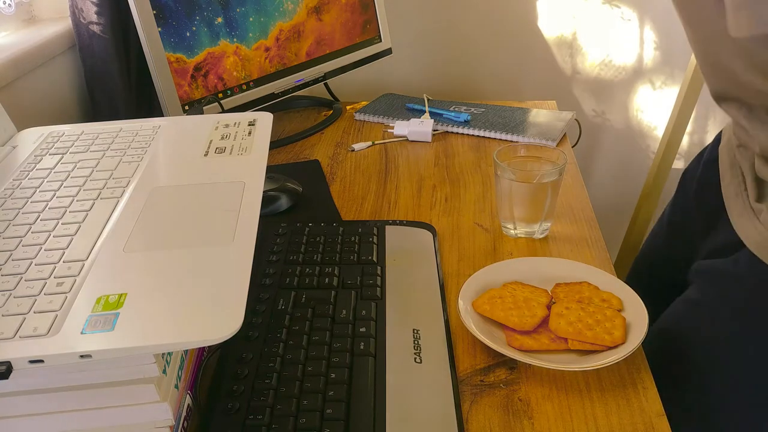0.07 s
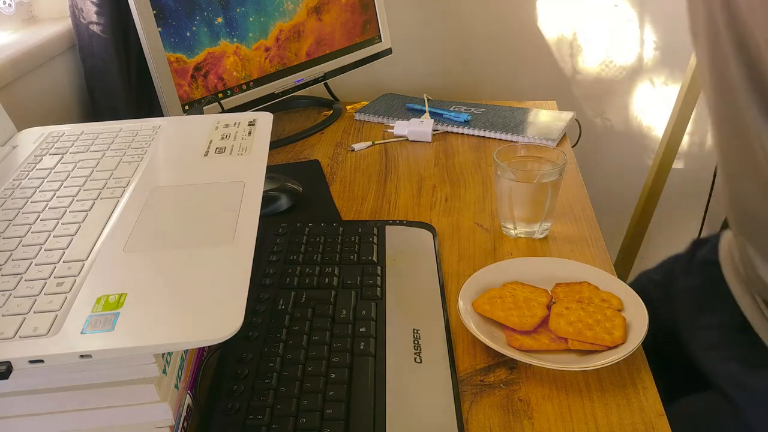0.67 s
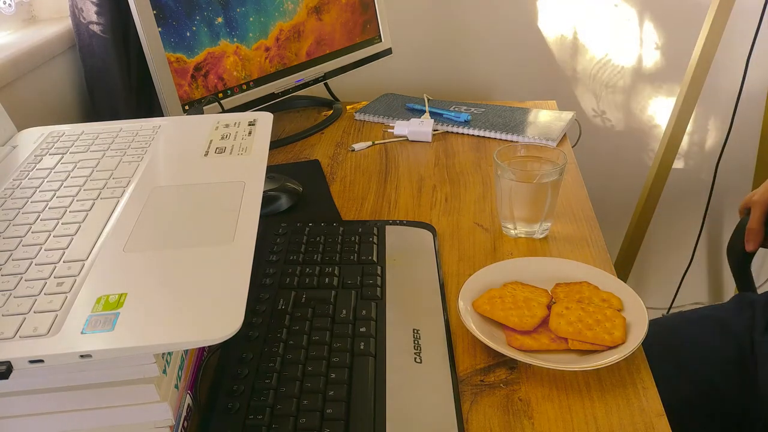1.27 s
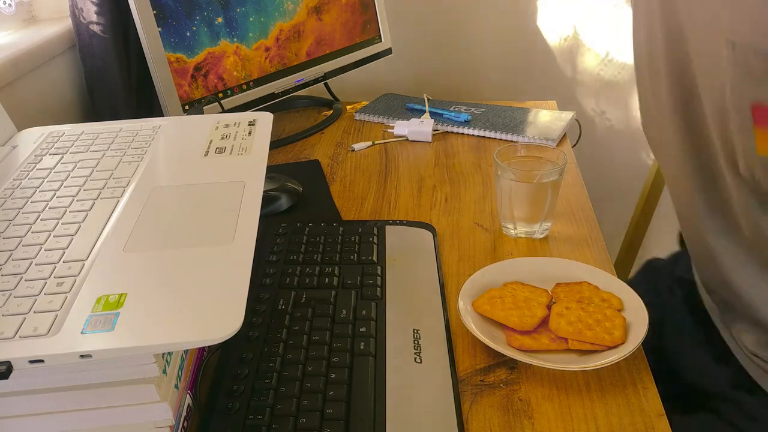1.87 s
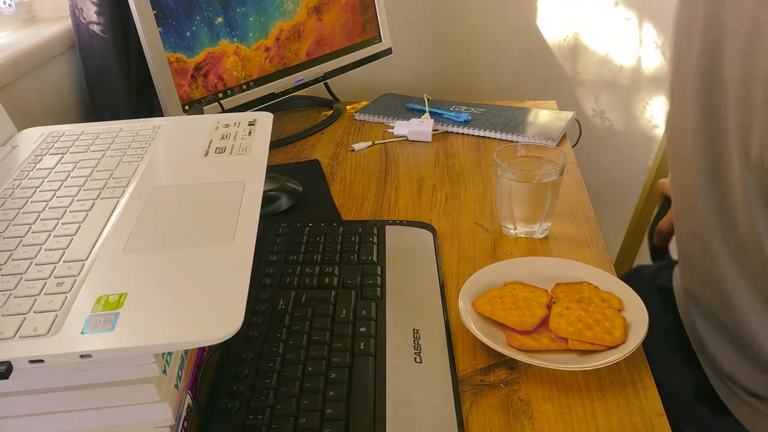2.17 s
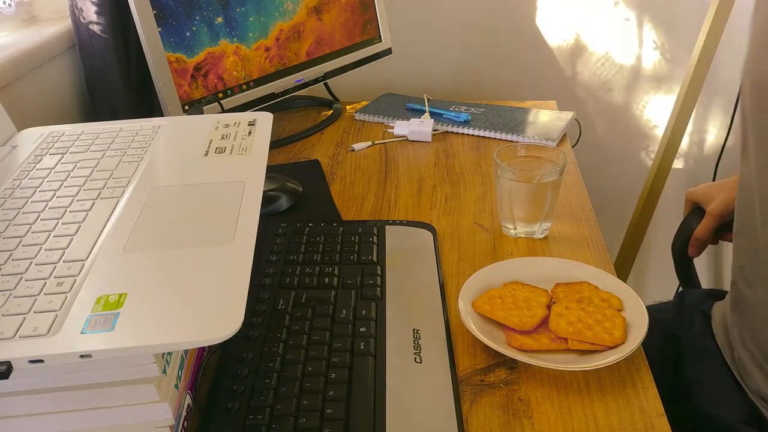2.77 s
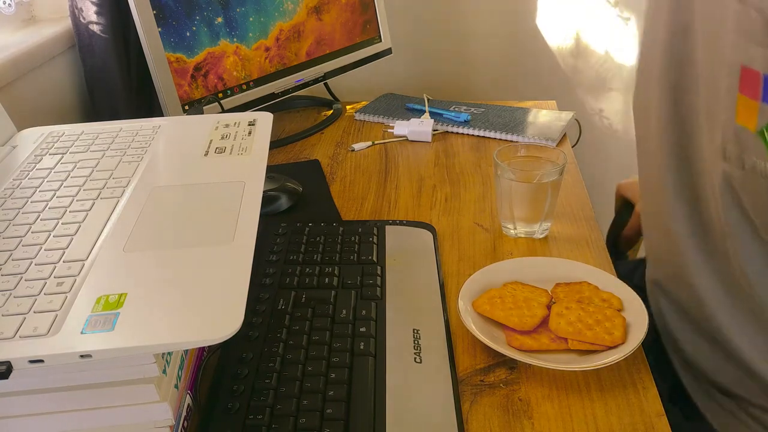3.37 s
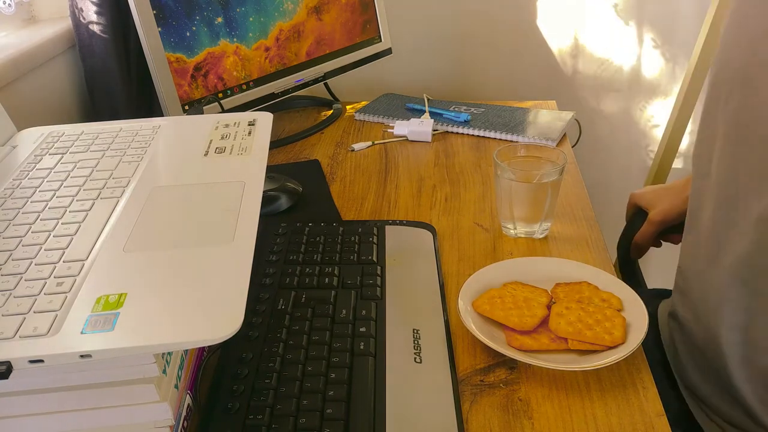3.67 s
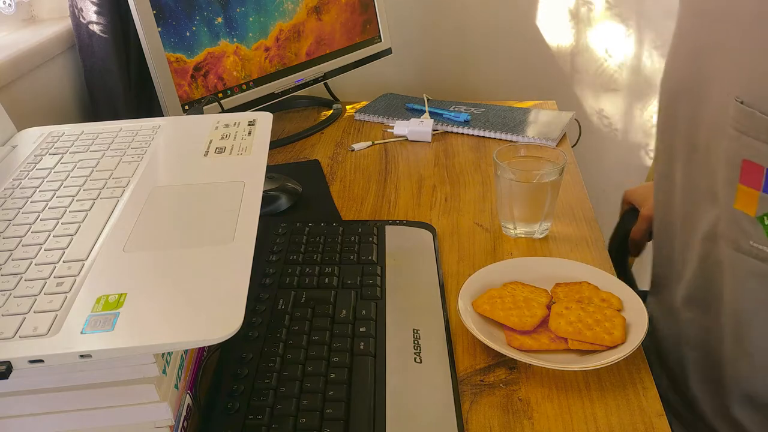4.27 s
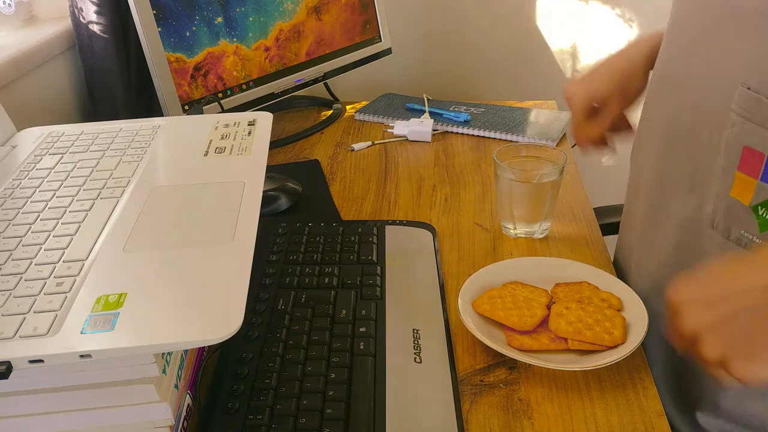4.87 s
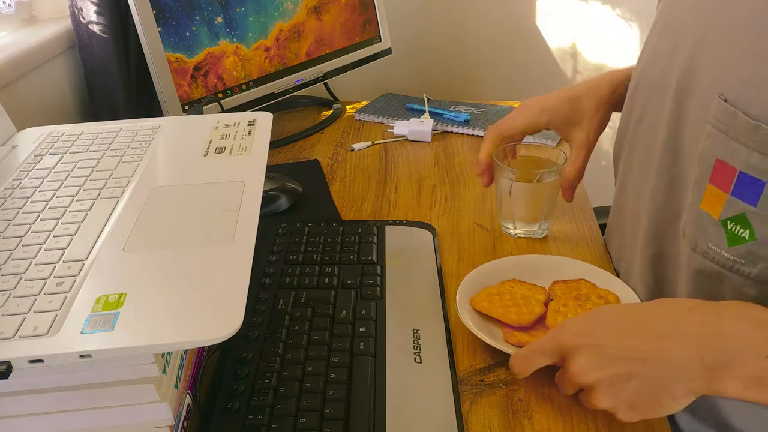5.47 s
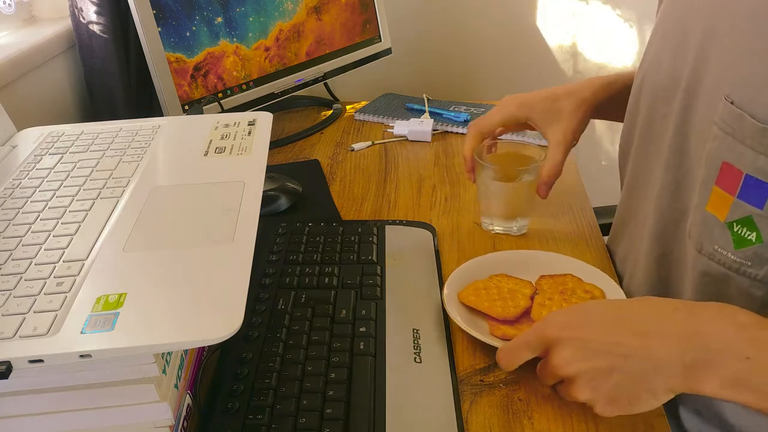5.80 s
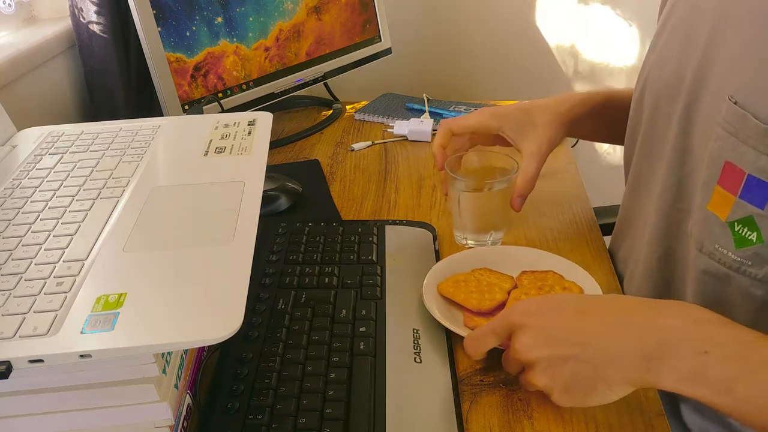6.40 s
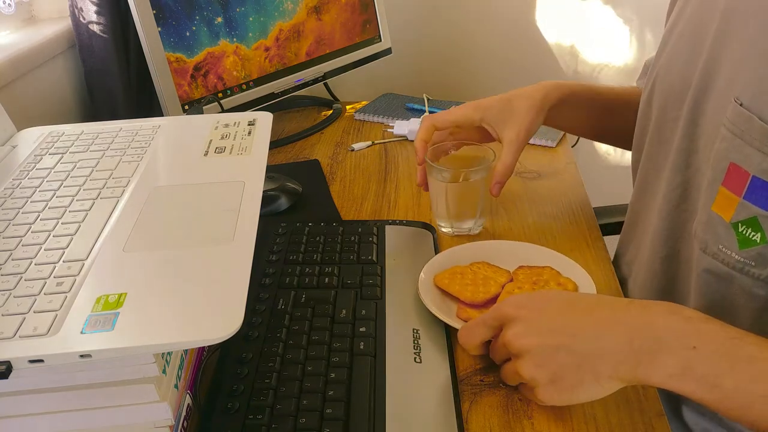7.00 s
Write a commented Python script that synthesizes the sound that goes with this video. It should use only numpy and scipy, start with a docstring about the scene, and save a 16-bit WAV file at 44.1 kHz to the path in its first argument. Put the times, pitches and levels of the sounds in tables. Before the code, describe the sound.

Heard from a phone at a desk in a small, quiet room, a wheeled chair is pulled about and sat in, giving separate bursts of creaks, short rolls, hard knocks, soft thumps and brief groans. Clothes rustle very faintly. After a short pause, a plate and a glass scrape over the wooden desktop in two jerky pushes, making the board drone. A faint hiss and low hum lie underneath.

```python
"""A faint hiss and a low hum fill a small room, heard from a phone standing at a desk. A desk chair on castors
creaks and squeaks, is tugged back in short rolls, and is sat in: loose parts knock and rattle, soft bumps shake
the floor, and loaded parts groan. Clothes brush as the body turns. Then, from about 5 seconds, a plate and a
glass are pushed across the wooden desktop in three goes: they stick and slip, and the board drones."""
import sys
import numpy as np
from scipy import signal
from scipy.fft import rfft, irfft
from scipy.io import wavfile
from scipy.ndimage import uniform_filter1d

SR = 44100
rng = np.random.default_rng(int(sys.argv[2]) if len(sys.argv) > 2 else 0)


def waveform_to_disk(signal):
    """Save audio, clipped to [-1, 1], as 16-bit WAV at the path in sys.argv[1]."""
    frames = np.transpose(np.atleast_2d(signal))
    scaled = np.clip(frames, -1, 1) * 32767
    samples = np.round(scaled).astype(np.int16)
    wavfile.write(sys.argv[1], SR, samples)


N = 310464
TAPS = 16384  # samples in a response: the sound a thing makes after one sharp tap
TIME = np.arange(N) / SR
FREQ = np.arange(TAPS // 2 + 1) * SR / TAPS


def undb(db):
    """Turn decibels into a gain to multiply by."""
    return 10 ** (np.asarray(db) / 20)


def along(points, hz=FREQ):
    """Read between (pitch_hz, value) points, giving each octave about equal room."""
    pitch_hz, value = np.transpose(points)
    return np.interp(np.log(hz + 1), np.log(pitch_hz), value)


def unit(x):
    """Scale to an energy of one."""
    return x / np.sqrt(np.sum(x ** 2))


def add(track, start_s, sound):
    """Mix a sound into a track."""
    start = max(int(start_s * SR), 0)
    track[start:start + len(sound)] += sound[:N - start]


def ring(force, response):
    """Every push in the force sets off the response."""
    return signal.oaconvolve(force, response)[:N]


def tightest(gain):
    """The most compact response that has this gain at each frequency."""
    cepstrum = irfft(np.log(np.maximum(gain, 1e-7)))
    cepstrum[1:TAPS // 2] *= 2
    cepstrum[TAPS // 2 + 1:] = 0
    return irfft(np.exp(rfft(cepstrum)))


def band(low_hz, high_hz, order=4):
    """Gains that pass one range of pitches; a higher order makes the edges steeper."""
    hz = FREQ + 1
    return ((1 + (low_hz / hz) ** (2 * order)) * (1 + (hz / high_hz) ** (2 * order))) ** -.5


def responses(colour, resonances, ranges):
    """How each part of an object rings: resonances stand out of a broad tone colour."""
    peaks = sum(db / (1 + (2 * (FREQ - hz) / width) ** 2) for hz, width, db in resonances)
    gain = undb(along(colour) + peaks)
    return [unit(tightest(gain * band(low, high, order=6)))[:TAPS // 2] for low, high in ranges]


def evened(response, size, tilt=1., longest_s=0.2):
    """Even out the broad colour but keep its fine ripples, then tilt it and damp the last ringing."""
    power = uniform_filter1d(abs(rfft(response, TAPS)) ** 2, size=size)
    broad = np.sqrt(np.abs(power) + 1e-9)
    even = signal.fftconvolve(response, tightest(tilt / broad))[:len(response)]
    return even * np.exp(-(TIME[:len(response)] / longest_s) ** 2)


def wander(size, rate):
    """Glide to a new random value, `rate` times a second."""
    return np.interp(TIME[:size] * rate, np.arange(1024), rng.standard_normal(1024))


def grains(size, rate, spread_db):
    """Tiny contacts of uneven strength at random moments, `rate` of them a second."""
    count = max(int(size * rate / SR), 1)
    force = np.zeros(size)
    where, strength, sign = rng.random((4096, 3))[:count].T
    force[(where * size).astype(int)] = undb(spread_db * (3.67 * strength - 2)) * np.sign(sign - .5)
    return unit(force) * np.sqrt(size)


def grown(db, growth, middling_db=-25):
    """Level of each part: it gains `growth` dB for each dB that a contact is above middling."""
    return middling_db + np.multiply.outer(growth, db - middling_db)


def rub(start_s, levels, parts, part_db, rate, judder_db, fade_s=0.0061):
    """A juddering stream of small slips shakes each part at its own changing level (dB)."""
    t = TIME[:len(levels[0])]
    fade = np.clip(np.minimum(t, t[-1] - t) / fade_s, 0, 1)
    force = grains(len(t), rate, spread_db=0.5) * undb(judder_db * wander(len(t), rate=47)) * fade
    out = np.zeros(N)
    for response, level, db in zip(parts, levels, part_db):
        add(out, start_s, signal.fftconvolve(force * undb(level + db), response))
    return out


def blows(hits, parts, first, rate, rebound_s, rebound_db):
    """Each blow is a first contact, a chatter that swells and dies, then a rebound; all parts ring."""
    out, age = np.zeros(N), TIME[:TAPS // 2]
    for start_s, swell_s, part_db in hits:
        progress = age / max(swell_s, .001)
        for late_s, strength in (0, 1), (rebound_s, undb(rebound_db)):
            chatter = unit(grains(len(age), rate, spread_db=2.0) * progress * np.exp(-progress))
            force = evened(chatter + first * (age == 0), size=21)
            for response, gain in zip(parts, strength * undb(part_db)):
                add(out, start_s + late_s, gain * unit(signal.fftconvolve(force, response)))
    return out


def two_mics(size):
    """Spectra of noise from all around at two microphones: alike in the bass, unrelated in the treble."""
    # how alike left and right are: pitch_hz, correlation
    likeness = [(60, 1), (130, 0.79), (280, 0.53), (600, 0.66), (1100, -0.28), (2000, -0.14),
                (4000, -0.025)]
    mid, side = rfft(rng.standard_normal((2, size)))
    alike = np.clip(along(likeness, np.arange(len(mid)) * SR / size), -.99, .99)
    return mid * np.sqrt(1 + alike) + side * np.sqrt(1 - alike) * np.array([[1], [-1]])


def reflections(direct, decay, build_s=0.0039):
    """Direct sound and a small room's dense echoes from one place, louder on the left."""
    # time for echoes to fall 60 dB, before `decay` scales it: pitch_hz, fade_s
    fade_times = [(60, 0.57), (150, 0.3), (400, 0.34), (1000, 0.22), (2000, 0.23), (5000, 0.22),
                  (12000, 0.17)]
    # how much louder the left is: pitch_hz, difference_db
    left_lead = [(60, 4), (150, 5.5), (500, 5), (1500, 6), (4000, 3), (8000, 7.5)]
    field, tail, age = two_mics(TAPS), 0, TIME[:TAPS]
    centres_hz = np.array(fade_times)[:, 0]
    for (_, fade_s), pick in zip(fade_times, np.eye(len(centres_hz))):
        share = along(np.column_stack([centres_hz, pick]))
        fade = np.exp(-np.log(1000) * age / (fade_s * decay))
        tail = tail + irfft(field * share) * fade / np.sqrt(fade_s)
    build = 1 - np.exp(-age / build_s)
    left, right = (unit(side * build) + direct * (age == 0) for side in tail)
    lean = undb(along(left_lead) / 2)
    return evened(left, size=7, tilt=lean), evened(right, size=7, tilt=1 / lean)


def room(sound, direct, decay, places=4, dwell_s=.07):
    """A moving source meets ever different echoes: it fades from one place to the next."""
    out = 0
    for place in range(places):
        away = abs((TIME / dwell_s - place) % places - places / 2)
        here = np.maximum(1 - away, 0) ** 0.59
        out = out + np.array([ring(sound * here, response) for response in reflections(direct, decay)])
    return out


def background(hiss_db=-67.5, left_lead_db=2.5):
    """The quiet room: an even hiss, and a low, wavering hum that swells and fades."""
    # tone colour of the hiss: pitch_hz, gain_db
    hiss_colour = [(15, -61), (25, -43), (42, -15.5), (64, -3), (86, -5), (260, -12.5), (482, -14.5),
                   (552, -18), (631, -16), (1240, -19.5), (2230, -23), (2630, -22.5), (15500, -34)]
    # loudness of the hum: time_s, level_db
    hum_levels = [(0, -71), (1.4, -103), (2.6, -71.5), (3.9, -72), (4.8, -81), (7, -83.5)]
    hz = np.arange(N // 2 + 1) * SR / N
    hiss = unit(irfft(two_mics(N) * undb(along(hiss_colour, hz)), N)) * np.sqrt(2 * N)
    hum = ring(rng.standard_normal(N), unit(tightest(band(low_hz=52.44, high_hz=76.5, order=3))))
    hum = hum * undb(np.interp(TIME, *np.transpose(hum_levels)))
    return (hiss * undb(hiss_db) + hum) * undb(np.array([[left_lead_db], [-left_lead_db]]) / 2)


def chair(lowest_roll_hz=135):
    """Contacts shake four parts, always listed in this order: frame, floor, castors, plastic."""
    # the chair's broad tone colour: pitch_hz, gain_db
    colour = [(24, -43.5), (40, -39), (119, -10.5), (277, -10), (412, -3), (502, -3), (824, 2.5),
              (1110, -4), (1870, -4.5), (2580, -15.5), (3930, -10), (7680, -24.5), (9360, -29),
              (10600, -50), (15000, -44.5)]
    # where it rings: pitch_hz, width_hz, boost_db
    resonances = [(62.9, 10, 18.5), (129, 25, 9.5), (179, 4.2, 9), (412.8, 29, 3), (451, 12, 4),
                  (622, 48, 3.5), (698, 8.3, 5), (786, 110, -3.5), (923, 16, -0.5), (1350, 20, 1),
                  (1501, 12, 6.5), (1673, 40, 3.5), (1879, 38.4, 2), (1970, 99, -1), (1830, 29, 5),
                  (3350, 140, 3), (3760, 16, -4), (3965, 50, 4), (5000, 160, 5), (7650, 300, 6)]
    # the range of each part: low_hz, high_hz
    ranges = [(289, 1253), (48.8, 275), (1535, 2620), (2430, 18000)]
    parts = responses(colour, resonances, ranges)
    # rubbing and rolling are too light for the floor's deepest notes
    light = responses(colour, resonances, np.maximum(ranges, lowest_roll_hz))
    contacts = knocks(parts) + thumps(parts) + creaks(light) + rolls(light) + squeak()
    return room(contacts, direct=0.15, decay=0.89)


def creaks(parts, edge_db=9, part_db=(-15, -24.5, 2, -21.5)):
    """A swivelling castor rubs in its socket, loudest midway through the turn."""
    # castor turns: start_s, length_s, level_db
    turns = [(0.022, 0.052, -59.5), (0.336, .025, -42.5), (0.375, 0.034, -31.5), (0.494, .04, -32.5),
             (0.572, .05, -46.5), (0.747, .04, -49.5), (0.907, .025, -54.5), (3.506, .014, -37.5),
             (4.413, .014, -32.5)]
    out = np.zeros(N)
    for start_s, length_s, db in turns:
        level = db - edge_db * np.linspace(-1, 1, int(length_s * SR)) ** 2
        out += rub(start_s, [level] * len(parts), parts, part_db, rate=1400, judder_db=-1, fade_s=0.0018)
    return out


def squeak(start_s=0.031, length_s=0.12, level_db=-70):
    """As the chair first takes weight, dry rubbing stirs one narrow, high resonance."""
    level = np.full(int(length_s * SR), level_db)
    resonance = unit(tightest(band(low_hz=3550, high_hz=3850, order=24)))
    return rub(start_s, [level], [resonance], part_db=[0], rate=1500, judder_db=3)


def rolls(parts, run_up_s=.24, rise_db_per_s=186, part_db=(1.5, -6.5, -2.5, -12.5)):
    """Each tug speeds the castors up at the same pace; they hold their speed until the chair stops."""
    # tugs along the floor: top_speed_at_s, stop_s, top_level_db
    tugs = [(0.278, 0.325, -54), (1.96, 2.075, -36.5), (3.318, 3.346, -33.5), (4.339, 4.355, -52)]
    out = np.zeros(N)
    for top_s, stop_s, db in tugs:
        t = np.arange(top_s - run_up_s, stop_s, 1 / SR)
        strength_db = db - rise_db_per_s * np.maximum(top_s - t, 0)
        levels = grown(strength_db, growth=(1.01, 0.73, 1.39, 1.5))
        out += rub(t[0], levels, parts, part_db, rate=1100, judder_db=1.5)
    return out


def groans(waver=.085, overtone=0.14):
    """Under load, slips lock onto one resonance for a moment and make a rough, wavering tone."""
    # brief groans and booms: middle_s, length_s, pitch_hz, level_db
    tones = [(0.289, 0.11, 211.3, -46.5), (1.969, 0.2, 184, -39.5), (2.066, .06, 442.5, -33.5),
             (2.35, 0.12, 113.6, -43), (3.294, 0.13, 433, -34.5), (4.44, 0.15, 122.8, -46.5),
             (4.489, 0.29, 75, -50), (6.703, 0.058, 433.6, -31)]
    out = np.zeros(N)
    for middle_s, length_s, hz, db in tones:
        size = int(length_s * SR)
        pitch_hz = hz * (1 + waver * wander(size, rate=170))
        phase = 2 * np.pi * np.cumsum(pitch_hz) / SR
        tone = np.sin(phase) + overtone * np.sin(2 * phase)
        add(out, middle_s - length_s / 2, undb(db) * tone * signal.windows.tukey(size, .7))
    return room(out, direct=0.96, decay=0.68, places=2)


def knocks(parts, part_db=(20.87, 15, 22.1, 21.04)):
    """Hard, loose parts of the chair meet, chatter and meet again."""
    # clacks: start_s, level_db, castor_ring_boost_db, plastic_tick_boost_db, swell_s
    clacks = [(0.255, -55.5, 0, 6, 0.0053), (0.365, -24.5, 7.5, -7.5, 0.0077),
              (0.434, -27, 1, -1.5, 0.0054), (0.574, -41, 5.5, 6, 0.0045), (0.86, -43, -11, -12.5, 0.0074),
              (1.39, -51.5, -6, -1, 0.0047), (1.552, -60, -9, 6, 0.008), (1.619, -54, -8, 4, 0.028),
              (1.74, -35, 3.5, -9, 0.0063), (2.083, -18.5, 2.5, -0.5, 0.0062),
              (2.22, -26.5, 1, -10, 0.0063), (3.288, -38, 2, -1.5, 0.0072),
              (3.342, -15.5, 2, -11.5, 0.0063), (3.36, -21.5, 0, -1.5, 0.01),
              (4.384, -31.5, -10, -16, 0.013), (4.418, -37.5, 6.5, -12.5, 0.0039)]
    growth = (0.98, 0.66, 0.94, 1.136)  # rattle grows faster than thud
    hits = [(start_s, swell_s, grown(db, growth) + part_db + np.array([0, 0, ring_db, tick_db]))
            for start_s, db, ring_db, tick_db, swell_s in clacks]
    return blows(hits, parts, first=0.3, rate=1400, rebound_s=.011, rebound_db=-5)


def thumps(parts, swell_s=.0032, part_db=(21, 16, 1, -9)):
    """Dull bumps: the softer the contact, the more goes into the floor and the less into the castors."""
    # heavy bumps of the chair and its load: start_s, level_db, hardness_db
    bumps = [(0.255, -46.5, -11.5), (0.495, -34, -4), (0.634, -41, 0), (0.745, -47, 1),
             (1.614, -54.5, -6.5), (1.675, -46.5, 22), (1.788, -39, -1), (2.229, -25, 9), (2.31, -23.5, 9),
             (2.645, -42.5, -6), (3.712, -32.5, -2.5), (4.387, -30, -0.5), (4.444, -39.5, -10)]
    slope = np.array([-0.18, -1.52, 0.2, -0.98])  # dB in each part per dB of hardness
    hits = [(start_s, swell_s, db + hardness_db * slope + part_db) for start_s, db, hardness_db in bumps]
    return blows(hits, parts, first=0.4, rate=1500, rebound_s=.014, rebound_db=-11.5)


def clothes():
    """Fibres slide over each other with a soft, high hiss that swells and fades."""
    # brushes as the body turns: middle_s, length_s, level_db
    brushes = [(3.828, 0.48, -70), (4.165, 0.18, -73.5)]
    swell = np.zeros(N)
    for middle_s, length_s, db in brushes:
        add(swell, middle_s - length_s / 2, undb(db) * np.hanning(int(length_s * SR)))
    fibres = unit(tightest(band(low_hz=2920, high_hz=7300, order=3)))
    hiss = ring(swell * rng.standard_normal(N), fibres)
    return room(hiss, direct=0.44, decay=0.75, places=2)


def dishes():
    """The dishes stick and slip on the wood: the plate grinds, the board drones, fine grit hisses."""
    # the desktop's broad tone colour: pitch_hz, gain_db
    colour = [(24, -72), (40, -28.5), (120, 0), (193, 3), (223, -2.5), (377, -6), (415, -7.5), (490, 0.5),
              (685, -9.5), (753, -6.5), (956, -11.5), (1130, -22.5), (3230, -33), (4300, -44.5),
              (12000, -70), (15600, -101.5), (22000, -120)]
    # where it rings: pitch_hz, width_hz, boost_db
    resonances = [(72.6, 13, 5.5), (119.2, 12, 7), (136, 24, 0), (190.7, 6.8, 2), (253.7, 16, 7),
                  (371, 57, 5.5), (411.4, 22, 7.5), (487.6, 33, 4.5), (760, 28, 0.5), (980, 190, -0.5),
                  (1242, 24, 7), (1954, 93, 2), (2160, 88, -2), (3380, 150, 1), (5400, 990, 4.5)]
    # the ranges of plate, board and grit, in that order: low_hz, high_hz
    ranges = [(344, 1050), (55, 333), (1157, 14000)]
    parts = responses(colour, resonances, ranges)
    return room(catches(parts) + sliding(parts), direct=0.49, decay=0.48)


def catches(parts, swell_s=0.0028, part_db=(18, 21.5, -3), growth=(0.81, 1, 0.3)):
    """The dishes touch, catch and let go, jolting plate and board each time."""
    # jolts: start_s, level_db, drone_boost_db
    jolts = [(5.263, -50.5, 6), (5.472, -32, -13), (5.718, -19.5, -6), (5.733, -18.5, -10),
             (5.866, -21, -12.5), (5.885, -25.5, -10), (5.958, -20, -19.5), (6.114, -31, -7.5),
             (6.235, -34, 9), (6.285, -23.5, -2), (6.561, -36, -0.5), (6.673, -32.5, -1.5),
             (6.824, -27, -13), (6.887, -31, -17)]
    hits = [(start_s, swell_s, grown(db, growth) + part_db + np.array([0, drone_db, 0]))
            for start_s, db, drone_db in jolts]
    return blows(hits, parts, first=0.39, rate=1300, rebound_s=.012, rebound_db=-3)


def sliding(parts, drone_start_db=-12.5, drone_build_s=.3):
    """The dishes' foot rings rub on the wood; the drone builds as the plate leaves the desk's edge."""
    # the push across the desk: time_s, grind_db, grit_db
    push = [(5.44, -68, -91), (5.492, -32.5, -53.5), (5.688, -32.5, -48.5), (5.734, -38.5, -52),
            (5.85, -35.5, -65), (5.89, -28, -47.5), (5.924, -39, -64), (5.96, -36.5, -52),
            (6.21, -39.5, -65), (6.282, -32, -55.5), (6.442, -50, -76), (6.674, -43.5, -67.5),
            (6.686, -37, -60.5), (6.75, -36.5, -56), (6.9, -40, -60.5), (7.04, -65, -105)]
    time_s, grind_db, grit_db = np.transpose(push)
    t = np.arange(time_s[0], time_s[-1], 1 / SR)
    grind, grit = np.interp(t, time_s, grind_db), np.interp(t, time_s, grit_db)
    drone = grind + drone_start_db * np.maximum(1 - (t - t[0]) / drone_build_s, 0)
    return rub(t[0], [grind, drone, grit], parts, part_db=(-5, -3, 2.5), rate=2000, judder_db=1.0)


def scene():
    """Chair, clothes, dishes and their groans in the quiet room."""
    return chair() + clothes() + dishes() + groans() + background()


def record(dry, top_hz=15720):
    """The phone colours the treble and cuts off the very top."""
    # the microphone's treble: pitch_hz, gain_db
    treble = [(8500, 0), (10400, -5.5), (11800, -1), (13500, 3), (15500, 3.5)]
    microphone = tightest(undb(along(treble)))
    heard = np.array([ring(channel, microphone) for channel in dry])
    return signal.sosfilt(signal.ellip(10, .2, 70, top_hz, fs=SR, output="sos"), heard)


dry = scene()
out = record(dry)
waveform_to_disk(out)
```